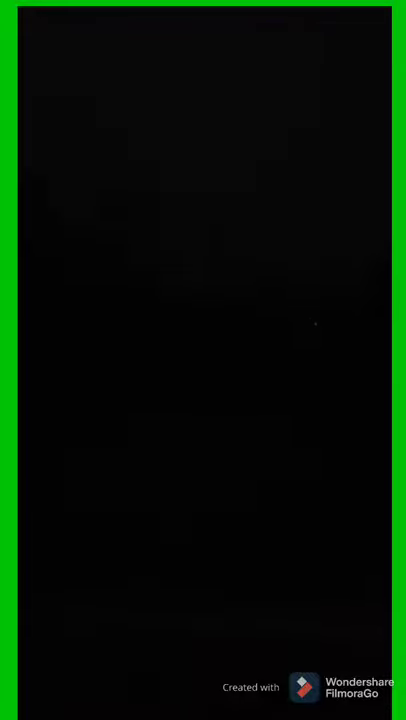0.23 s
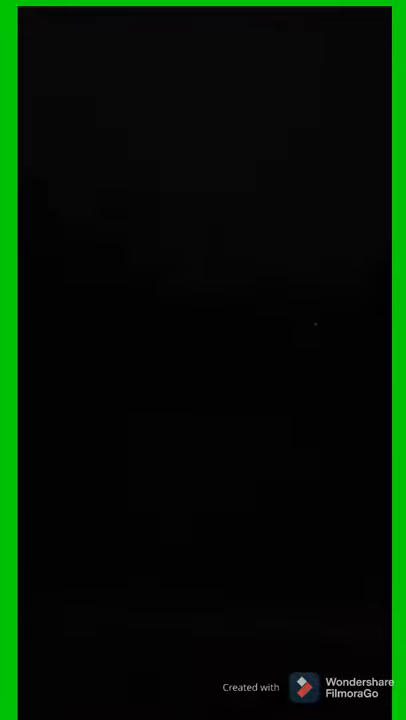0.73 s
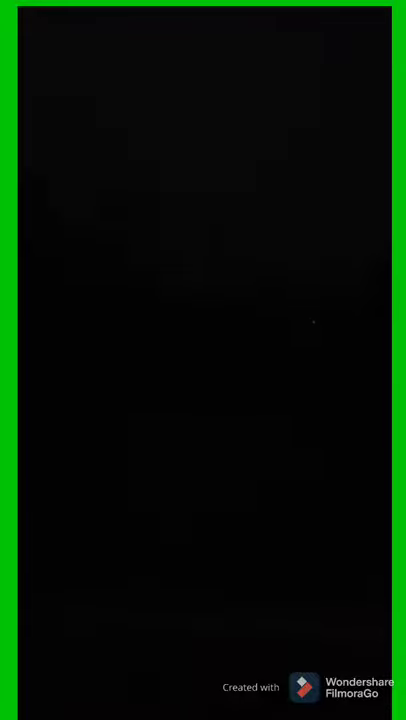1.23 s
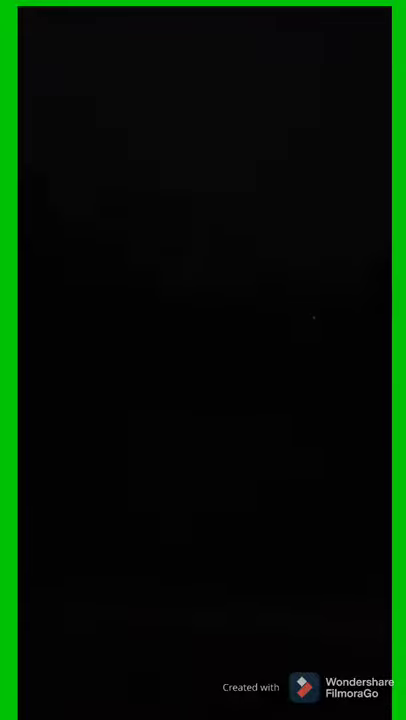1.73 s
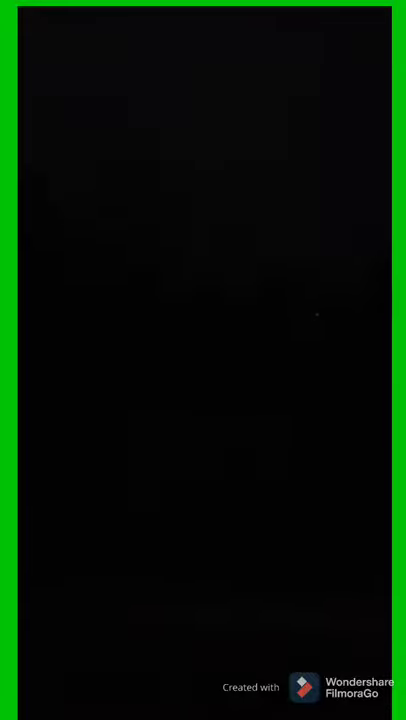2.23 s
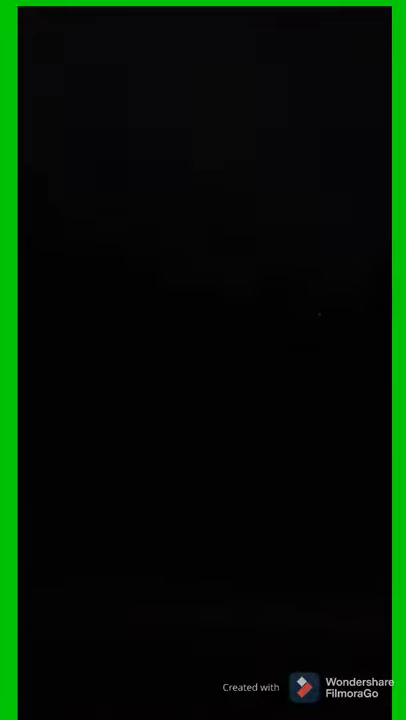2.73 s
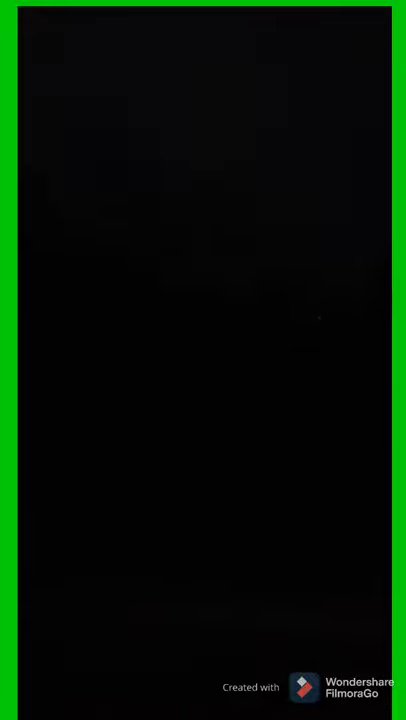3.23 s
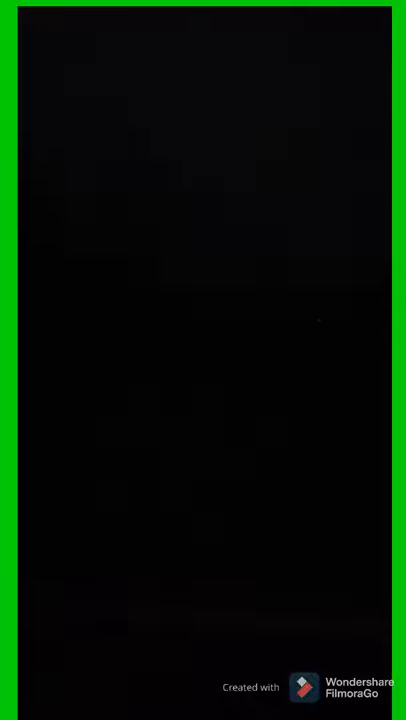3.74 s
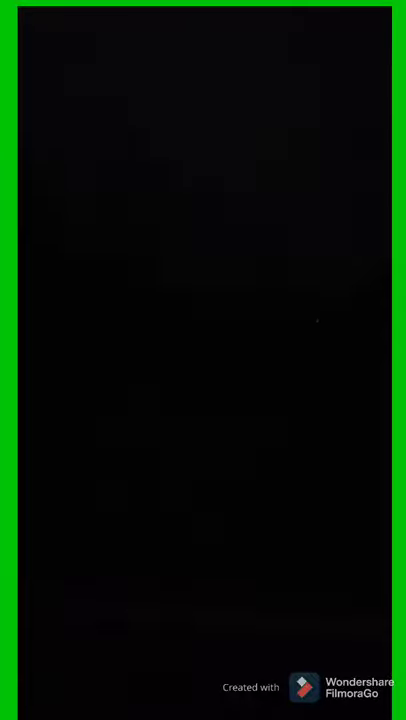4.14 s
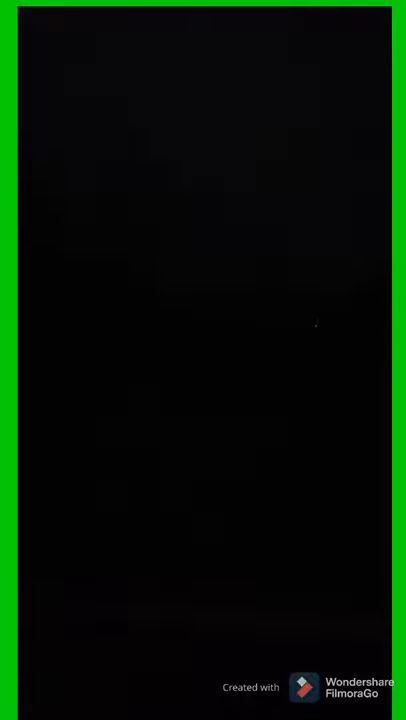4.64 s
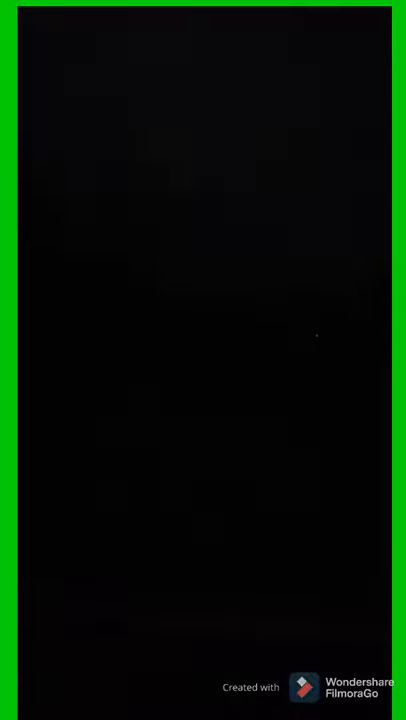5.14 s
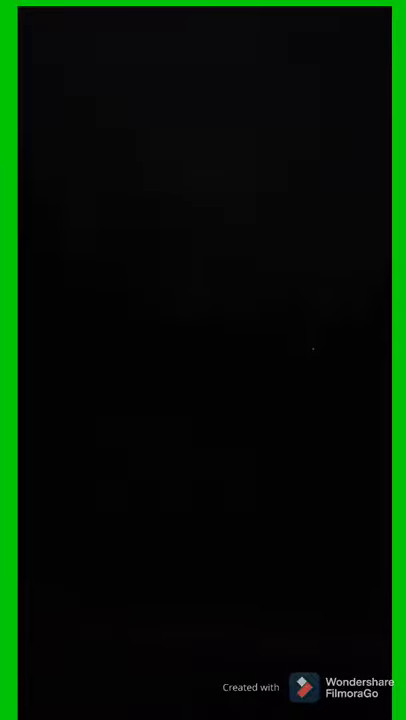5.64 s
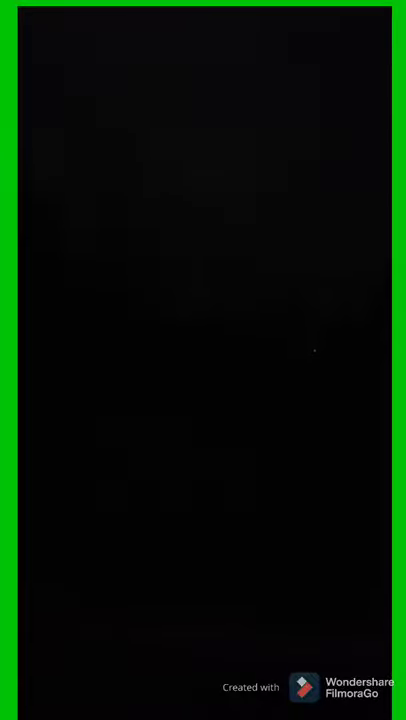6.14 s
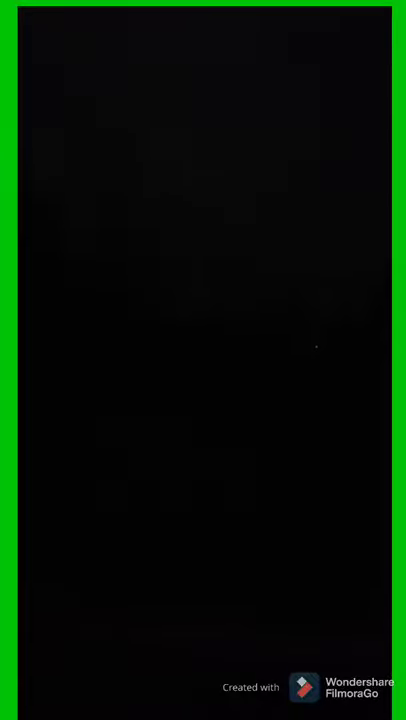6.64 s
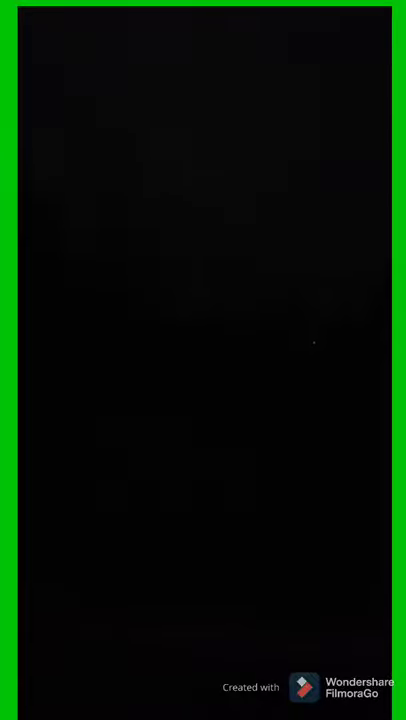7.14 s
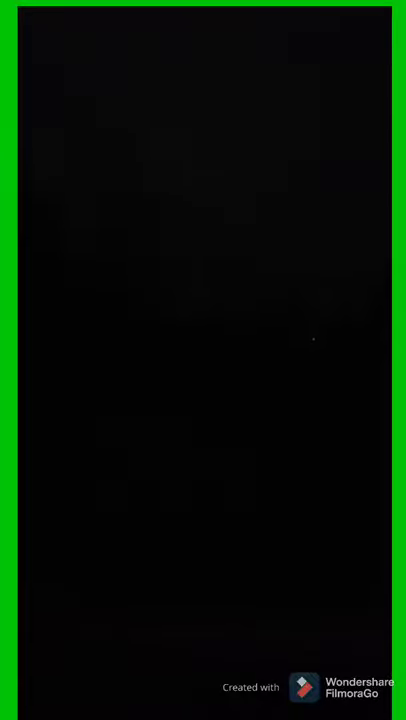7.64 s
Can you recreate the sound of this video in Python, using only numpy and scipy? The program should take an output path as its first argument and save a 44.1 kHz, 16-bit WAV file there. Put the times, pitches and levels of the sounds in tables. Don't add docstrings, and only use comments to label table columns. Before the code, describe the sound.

Coyotes call over open ground in the dark: short moans and whines first, a cluster of yips, a rapid burst of hoarse closer barks, then one long sustained howl with gruff barks beneath it. It cracks high, falls and fades through low wavering moans. Diffuse echoes trail each cry. A low electrical hum and far traffic rumble stay constant, with thin insect hiss to the left and a few soft wind thumps on the phone's right microphone.

```python
import sys
import numpy as np
from scipy import signal
from scipy.fft import rfft, irfft, next_fast_len
from scipy.io import wavfile
from scipy.ndimage import uniform_filter1d

SR = 44100
rng = np.random.default_rng(int(sys.argv[2]) if len(sys.argv) > 2 else 0)


def how_loud(loudness_db):
    steps = np.asarray(loudness_db, float) / 20
    return 10 ** steps


def store_wav(level_fs):
    pcm = np.round(np.clip(np.atleast_2d(level_fs), -1, 1) * 32767)
    wavfile.write(sys.argv[1], SR, pcm.T.astype(np.int16))


N = 347803

# (time [s], pitch [Hz], effort [dB], mouth opening on upper partials [dB])
OPENING_HOWL = [(0, 636, -33.5, -14), (.1, 616, -42, -12), (.15, 608.7, -44, -10), (.25, 615.4, -46.5, -4),
                (.289, 629.5, -34.5, -4.5), (.315, 752, -48, -11), (.335, 709, -40, -4),
                (.36, 617.3, -35.5, -9), (.429, 570, -70, 2)]
LOW_MOAN = [(.37, 512, -58, -19), (.392, 505, -56, 11.5), (.47, 481, -53.5, 6), (.545, 504.6, -63, 3),
            (.6, 537, -48, -5)]
RISING_MOAN = [(.74, 492, -48, -11), (.772, 495.5, -48.5, 1), (.81, 499, -58, -2), (.85, 514, -47, -2),
               (.88, 536, -50.5, -8), (.908, 549, -51, -4), (.922, 581, -42, -3), (.945, 616.6, -39, 0),
               (.99, 607.4, -46.5, 2), (1.03, 620, -53.5, 7), (1.055, 605, -67, 1)]
WAVERING_MOAN = [(1.07, 525, -55.5, -1), (1.12, 548, -55.5, 4), (1.18, 524.6, -60, 3.5),
                 (1.24, 483.6, -58, 2.5), (1.3, 523, -54.5, 6), (1.36, 494, -56, 6.5),
                 (1.394, 501, -52.5, 7), (1.442, 546, -50, -8), (1.494, 543, -41.5, -11.5),
                 (1.539, 544, -42, -16)]
SQUEAK = [(2.89, 1035, -46.5, -14), (2.93, 1166, -40.5, -11.5), (2.972, 1200, -25, -23),
          (2.985, 1209, -33, -24.5), (3.0, 1404, -44, -26)]
LAST_MOAN = [(6.92, 474.6, -54, -2), (7.0, 466.5, -53, -7), (7.05, 453.4, -44, -10.5), (7.11, 500, -53, 3),
             (7.14, 498, -65, -10), (7.17, 496.7, -48.5, 1), (7.205, 488, -50, -8), (7.24, 480, -46, 4.5),
             (7.28, 448, -52, -24), (7.35, 417, -49, -18), (7.43, 407, -52, -19)]
# (time [s], pitch [Hz], effort [dB], mouth opening [dB], lips on third partial [dB])
HOWL_SWELL = [(2.965, 666, -53.5, -8.5, -10.5), (2.99, 714, -39.5, -13, -9), (3.02, 745, -37, -18.5, -13),
              (3.05, 743.5, -38, -16.5, -20), (3.07, 738, -37, -15, -3), (3.098, 725.5, -36.5, -9, -0.5),
              (3.19, 710, -42.5, -16.5, 9), (3.256, 699.6, -39.5, -2.5, -1), (3.36, 682.5, -36.5, -3, -16),
              (3.5, 699, -34, -10, -7), (3.6, 698, -34.5, -15, -2.5), (3.665, 698.8, -33, -27, -6.5),
              (3.72, 699, -34, -9.5, -5.5), (3.79, 703.5, -37, -6, -10), (3.87, 727, -32.5, -28.5, -27),
              (3.925, 741, -34, -13.5, -32), (3.985, 755, -45, -18, -28)]
HOWL_HOLD = [(3.96, 748.6, -45.5, -16, -29.5), (4.04, 742, -33.5, -21, -24.5), (4.11, 726, -34, -9, -22),
             (4.2, 710, -33.5, -13.5, -19), (4.225, 700, -39.5, -20.5, -22), (4.28, 687.7, -31.5, -20, -18),
             (4.34, 680.4, -35.5, -8.5, -7.5), (4.41, 692.5, -32, -20, -7.5),
             (4.46, 710.5, -36, -17.5, -22), (4.52, 719.5, -33, -21.5, -26),
             (4.59, 719.4, -32.5, -34, -17.5), (4.65, 713, -38.5, -10.5, -14.5),
             (4.75, 705.3, -35.5, -18.5, -17), (4.79, 700.5, -37, -18, -8), (4.84, 758, -38, -18, -22)]
BREAK_AND_FALL = [(4.815, 807.6, -54, -2.5, -9), (4.855, 903.4, -39.5, -0.5, -4),
                  (4.915, 888.7, -44, -2, -2), (4.957, 786, -48.5, -2, -3.5), (5.05, 766, -45.5, -11, -3),
                  (5.118, 748.4, -34.5, -16, -26), (5.17, 729.6, -42, -20, -6), (5.21, 713, -37, -18, -13),
                  (5.25, 690.7, -33.5, -15, -16), (5.285, 660.7, -45, 1, 0),
                  (5.32, 652.7, -35.5, -6.5, -20), (5.37, 610.3, -45, 0, -12), (5.4, 594, -36, -21, -16),
                  (5.44, 579.5, -48, -20, -12), (5.485, 549, -40, -26, -11), (5.53, 527, -54, -6, -8)]
LOW_HOLD = [(5.515, 538.6, -59, -4, -8), (5.62, 498.5, -53, -3, -6), (5.72, 492.7, -47, -5, -16),
            (5.775, 496.4, -53, -20, -16), (5.82, 493.8, -46.5, -1.5, -14), (5.95, 500, -49.5, -1, -14),
            (6.07, 470, -49, -2.5, -14), (6.11, 462, -46, -16, -16), (6.19, 477.7, -48.5, -7.5, -12),
            (6.215, 478, -57, -13, -10), (6.25, 475, -57, 3.5, 0), (6.33, 452, -48, -9, -2),
            (6.45, 444.4, -43, -6, -6), (6.56, 452, -44.5, -9.5, -4), (6.62, 456, -55, -24, -10),
            (6.7, 495, -51, -12, -12)]
# (howl, third partial [dB], throb rate [1/s], throb depth [dB], moment of least fundamental [s])
LEAD_VOICE = [
    (LOW_MOAN, -23, 8.2, 2.4, 0.481),
    (RISING_MOAN, -30, 12.5, 0.8, 0.84),
    (WAVERING_MOAN, -20, 9.7, 1.3, 1.3),
    (SQUEAK, -26, 7.8, .4, 3.2),
    (OPENING_HOWL, -35, 5.7, 0.44, 0.19),
    (HOWL_SWELL, -10.5, 2.7, 0.48, 4.3),
    (HOWL_HOLD, -12.5, 14, 0.34, 2.2),
    (BREAK_AND_FALL, -11, 20, 0.83, 5.33),
    (LOW_HOLD, -22, 7.9, 0.66, 5.7),
    (LAST_MOAN, -22, 15.3, 1.9, 6.6),
]
# (frequency [Hz], level [dB])
HEAD = [(430, -8.5), (620, -1.5), (720, 0), (1000, -2), (1400, -10), (1850, -21), (2100, -12),
        (2320, -21.5)]
# (time [s], pitch [Hz], effort [dB], mouth opening [dB])
BRIGHT_YELP = [(3.172, 580, -58.5, 14), (3.19, 613, -58, 16), (3.215, 653, -56.5, 20),
               (3.24, 607, -57.5, 13), (3.262, 570, -59.5, 13)]
LATE_BREAK = [(6.66, 493, -55.5, 2), (6.715, 501, -64, 1.5), (6.735, 612, -65, 4.1), (6.77, 681, -62, 7.5),
              (6.795, 682, -58.5, 5.2), (6.825, 620, -56, 4.2), (6.84, 590, -70, 3)]
FALLING_CRY = [(.635, 702, -59.5, 6.8), (.655, 659, -51.5, 6.7), (.668, 612, -54, 5), (.676, 539, -57, 4.3),
               (.7, 521, -52, 3.9), (.72, 490, -59, 3)]
SINKING_CRY = [(6.8, 556, -63, 3), (6.825, 538, -53.5, 3.4), (6.845, 523, -64, 2.6), (6.865, 502, -56, 3),
               (6.89, 448, -59, 2)]
# (start [s], length [s], top pitch [Hz], effort [dB], mouth opening
# [dB])
YIPS = [
    (1.243, 0.13, 682, -55, -19),
    (1.563, 0.081, 712, -50.5, 2.5),
    (1.724, 0.099, 720, -53.5, 5.5),
    (1.922, 0.075, 711, -55.5, 7),
    (1.634, .06, 642, -60, 3),
    (1.989, 0.089, 644, -63.5, 2),
]
# (start [s], length [s], top pitch [Hz], effort [dB], mouth opening [dB])
WHINES = [(.593, 0.066, 709.3, -51.5, 2), (.66, 0.24, 710.6, -66, 5.5), (0.995, 0.054, 499.6, -58, 1.5),
          (1.075, 0.09, 610, -56.5, -3), (1.02, .07, 720, -65.5, 3.5), (1.56, 0.12, 590.5, -48.5, -11.5),
          (1.75, 0.17, 726, -62, 6), (1.8, 0.075, 580, -50, -8), (1.99, 0.088, 556, -54, -8.5),
          (7.105, 0.054, 617, -61, 7), (7.32, 0.073, 605, -70, 1.5), (7.13, 0.047, 725, -68.5, 7),
          (1.085, .09, 815, -73, 15.5), (1.25, .1, 996, -81, 16), (4.84, .14, 711, -50, -24.5),
          (4.91, 0.064, 591, -50.5, -25), (5.48, 0.097, 715, -53.5, -25), (.3, 0.061, 345.5, -45, -30),
          (1.55, 0.041, 358.6, -41.5, -31), (4.04, 0.085, 340, -46, -32), (4.29, 0.044, 389, -48.5, -29),
          (4.385, 0.047, 396, -40, -28), (5.25, 0.054, 355, -49.5, -28)]
# (time [s], effort [dB], pitch [Hz], brightness [dB per octave])
FIRST_BARK = [(2.27, -68, 481, 0), (2.302, -51, 481, 0.5), (2.318, -42.5, 501, -1), (2.33, -37.5, 570, 0.5),
              (2.36, -34.5, 584, 5), (2.385, -32.5, 621, 7), (2.4, -33, 700, 0.5),
              (2.429, -41.5, 673, -0.5), (2.48, -57, 660, -4)]
SECOND_BARK = [(2.51, -52, 489, -10.5), (2.548, -32, 590, -4), (2.581, -32.5, 595, 5.5),
               (2.602, -28, 590, 9), (2.618, -33, 781, 7.5), (2.64, -36, 749.5, 5), (2.665, -39, 670, 1),
               (2.69, -35, 641, -2), (2.73, -47.5, 640, 6)]
THIRD_BARK = [(2.73, -49.5, 517, -3.5), (2.76, -35.5, 545, -2), (2.775, -38.5, 660, 3.5),
              (2.795, -37.5, 700, 4), (2.815, -39, 716, 3.5), (2.825, -39.5, 598, -1.5),
              (2.85, -43.5, 590, -3.5), (2.89, -56, 571, -2.5)]
LOW_BARK = [(2.645, -54, 404, 9), (2.685, -44, 428.7, 8.3), (2.705, -47, 426.2, 5.3),
            (2.725, -37, 448.4, 6.1), (2.76, -42.5, 439, 4), (2.801, -37.5, 480.5, 5),
            (2.85, -52, 475, 5.1)]
# (start [s],
# length [s], effort [dB], top pitch [Hz], brightness [dB per octave])
MID_BARKS = [(4.065, 0.056, -50, 479, 1.5), (4.105, 0.09, -39, 488, 2.5), (4.15, 0.098, -37.5, 615.4, 0.5),
             (4.215, .08, -51, 559, -1.5), (4.28, 0.1, -43.5, 471.5, 2.5), (4.31, 0.062, -39.5, 556, -3),
             (4.345, .095, -33, 620.6, -1.5), (4.4, .07, -43.5, 490, 0.5), (4.45, 0.081, -55, 485.5, 0),
             (5.15, 0.16, -53.5, 598, -2), (5.32, 0.153, -56.5, 601, 10.5), (7.6, 0.24, -71, 586, 19),
             (7.64, 0.19, -73, 476, 30), (2.88, 0.11, -54.5, 744, 15.5), (2.97, .1, -51.5, 723, 15.5),
             (3.28, .2, -54.5, 560, 3.5), (3.45, .15, -58, 530, 5), (3.571, .16, -57, 558, 3.5)]
# (frequency [Hz], width [Hz], level [dB])
THROAT = [(346, 39, -15.5), (590, 101, 10.5), (700, 70, 4.5), (843, 60, 7.5), (987, 78, 8),
          (1204, 150, 1.5), (1448, 100, -7.5), (1691, 73, -6), (2120, 222, -20), (2630, 300, -39)]
# (frequency [Hz], time [s])
ECHO_T60 = [(300, 1.5), (700, 1.22), (1500, 1.17), (3000, 0.77)]
# (delay [s], spread [s], level [dB])
TREELINE = [
    (.16, .06, 2),
    (.47, .1, 6),
]
# (middle [s], peak [dB], pitch [Hz], length [s])
PUFFS = [
    (1.556, -18, 75, 0.023),
    (4.072, -25.5, 62, 0.024),
    (4.166, -23, 68, 0.02),
    (4.249, -27.5, 58, 0.046),
    (4.403, -32, 55, 0.034),
    (6.641, -33, 60, 0.051),
]
# (frequency [Hz], level [dB per Hz])
INSECTS = [(6080, -39), (6220, -5.5), (6500, -4.5), (7050, -0.5), (7350, -1), (7700, -7.5), (7900, -8),
           (8020, -39)]
# (time [s], level [dB])
INSECT_LEVEL = [(0.0, -67.5), (0.42, -68.5), (0.46, -64.5), (0.77, -69.5), (6.48, -70), (7.56, -70.5),
                (7.89, -69.5)]
# (multiple of twice the line rate, level [dB], waver [dB])
HUM = [(1, -36.5, 0.44), (2, -56.5, -1), (3, -60.5, 2.5), (4, -53.5, 1.5), (5, -60.5, 3), (6, -70.5, 1.5)]
# (frequency [Hz], level [dB per Hz])
NIGHT = [(20, -16.5), (40, -17.5), (62, 1.5), (95, -3.5), (170, -8), (350, -14), (520, -16.5), (800, -19),
         (1300, -37), (2000, -54), (3000, -60.5), (6000, -70)]
# (frequency [Hz], likeness [0 to 1])
NIGHT_SAME = [(30, 0.37), (60, 0.6), (160, 0.61), (270, 0.93), (450, 1), (740, 0.91), (1220, 0.93),
              (2500, 0.24)]
# (time [s], level [dB])
NIGHT_LEVEL = [(0, 1), (2.2, -.5), (3.5, 0.3), (5, 1), (6.5, -0.5), (7.3, 0.5), (7.89, -1.5)]
# (frequency [Hz], level [dB per Hz])
HISS = [(300, -3), (1500, 3.5), (4000, -1), (5800, -3), (8500, -10), (10500, -6), (12500, 0.5), (15700, -1)]


def evened(x):
    return x / np.sqrt(np.mean(x ** 2) + 1e-20)


def read(points, hz):
    f, value = np.transpose(points)
    return np.interp(np.log(hz + 1), np.log(f + 1), value)


def add(mix, s, sound):
    part = mix[round(s * SR):][:len(sound)]
    part += sound[:len(part)]


def drift(count, width_s):
    size = max(int(width_s * SR), 1)
    return evened(uniform_filter1d(uniform_filter1d(rng.standard_normal(count), size), size))


def bandpass(x, low_hz, high_hz):
    return signal.lfilter(*signal.butter(2, [low_hz, high_hz], "band", fs=SR), x)


def howl(rows, jitter=.004, flutter_db=1.5, breath_db=-24, hoarse=.3, fade_s=0.017):
    s, *columns = np.transpose(rows)
    t = np.arange(s[0], s[-1], 1 / SR)
    hz, *levels_db = (np.interp(t, s, c) for c in columns)
    slide = abs(np.gradient(np.log(hz))) * SR
    glide = np.clip(uniform_filter1d(slide, 900) / 6, 0, 1)
    wander = 1 + (jitter + .012 * glide) * drift(len(t), .004)
    phase = 2 * np.pi * np.cumsum(hz * wander) / SR
    partials = 0
    for k, db in enumerate(levels_db):
        flutter = flutter_db * (k + .5) ** 1.45 * drift(len(t), 0.014)
        partials = partials + how_loud(db + flutter) * np.sin((k + 1) * phase)
    haze = 1 + how_loud(breath_db) * drift(len(t), .0008) + hoarse * glide * drift(len(t), .003)
    halves = 1 + hoarse * glide * np.cos(phase / 2)
    already_on = fade_s / 2 * (t[0] == 0)
    edges = np.clip(np.minimum(t - t[0] + already_on, t[-1] - t) / fade_s, 0, 1)
    return s[0], np.sqrt(2) * partials * haze * halves * edges


def sung(rows, third_db, rate=5.0, throb_db=0.0, dip_s=0.0):
    s, *columns = np.transpose(rows)
    t = np.append(np.arange(s[0], s[-1], .005), s[-1])
    hz, effort_db, open_db, *lips_db = (np.interp(t, s, c) for c in columns)
    wave = .5 + .5 * np.cos(2 * np.pi * rate * (t - dip_s))
    depth, sharp = 3, 2.8
    odd_db = throb_db * (1 - depth * wave ** sharp)
    even_db = 1.5 * throb_db * (1 - depth * (1 - wave) ** sharp)
    lip_db = lips_db[0] if lips_db else 0.56 * open_db
    first = effort_db + read(HEAD, hz) + odd_db
    second = effort_db + read(HEAD, 2 * hz) + open_db + even_db
    third = effort_db + read(HEAD, 3 * hz) + lip_db + third_db + odd_db
    return np.transpose([t, hz, first, second, third])


def arch(start, length, skew, sharp):
    u = np.linspace(0, 1, 24)
    return start + length * u, abs(np.sin(np.pi * u ** skew)) ** sharp


def short_call(row, bend, skew, sharp, ends_db, third_db, opens_db):
    start, length, top_hz, effort_db, open_db = row
    t, a = arch(start, length, skew, sharp)
    mouth_db = open_db + opens_db * ((t - start) / length - .5)
    rows = np.transpose([t, top_hz * (1 - bend * (1 - a)), effort_db + ends_db * (1 - a), mouth_db])
    return sung(rows, third_db)


def yip(row):
    return short_call(row, bend=.21, skew=.6, sharp=1.2, ends_db=-1, third_db=-21.5, opens_db=4)


def whine(row):
    return short_call(row, bend=0.05, skew=.8, sharp=0.5, ends_db=-2, third_db=-26, opens_db=-5.0)


def bark(rows, jitter=.05, halves=.7):
    s, *columns = np.transpose(rows)
    t = np.arange(s[0], s[-1], 1 / SR)
    effort_db, hz, bright_db, rough = (np.interp(t, s, c) for c in columns)
    rough = np.clip(rough, 0, 1)
    turns = np.cumsum(hz * (1 + jitter * drift(len(t), .003))) / SR
    uneven = halves * np.clip(hz / 330 - 1, 0, 1)
    pulses = sum(np.cos(2 * np.pi * k * turns) for k in range(1, 5))
    folds = pulses * (1 + uneven * np.cos(np.pi * turns))
    puffs = (0.4 + np.exp(-(turns % 1) / .3)) * rng.standard_normal(len(t))
    drive = (1 - rough) * evened(folds) + .7 * rough * evened(puffs)
    throat = 0
    for k, (f, width, db) in enumerate(THROAT):
        ring = resonate(resonate(drive, f, 1.6 * width), f, 1.6 * width)
        throat = throat + (-1) ** k * how_loud(db + bright_db * np.log2(f / 900)) * ring
    steady = throat / np.sqrt(abs(uniform_filter1d(throat ** 2, 1500)) + 1e-12)
    effort = how_loud(effort_db + 2.0 * drift(len(t), 0.004))
    return s[0], effort * steady * signal.windows.tukey(len(t), .15)


def resonate(x, hz, width):
    return signal.lfilter(*signal.iirpeak(hz, hz / width, SR), x)


def pushed(rows):
    return np.column_stack([rows, np.interp(np.transpose(rows)[3], [-3, 7], [.1, .42])])


def barked(start, length, effort_db, top_hz, bright_db):
    t, a = arch(start, length, skew=.7, sharp=1)
    ends = 1 - a
    return np.transpose([t, effort_db - 12 * ends, top_hz * (1 - .14 * ends),
                         bright_db - 5 * ends, .18 + .04 * a])


def pack():
    far, lead, near, mid = np.zeros((4, N))
    cries = [sung(BRIGHT_YELP, third_db=-3.5), sung(LATE_BREAK, third_db=-25),
             sung(FALLING_CRY, third_db=-30), sung(SINKING_CRY, third_db=-26)]
    for rows in cries + [yip(row) for row in YIPS] + [whine(row) for row in WHINES]:
        add(far, *howl(rows, jitter=.004, flutter_db=1.3, breath_db=-22, hoarse=.2, fade_s=.004))
    for voice in LEAD_VOICE:
        add(lead, *howl(sung(*voice), jitter=.0018, flutter_db=.9, breath_db=-32, hoarse=.2))
    for rows in FIRST_BARK, SECOND_BARK, THIRD_BARK, LOW_BARK:
        add(near, *bark(pushed(rows), jitter=.032, halves=.85))
    for row in MID_BARKS:
        add(mid, *bark(barked(*row), jitter=.03, halves=.9))
    direct = how_loud(2.0) * (far + lead) + how_loud(-0.23) * (near + mid)
    aimed = lead + 3.2 * bandpass(lead, 1500, 1900)
    thrown = how_loud(0.5) * far + how_loud(-4.5) * aimed + how_loud(-1.5) * near + how_loud(-5.0) * mid
    ports = np.array([direct, np.roll(direct, 3)]) + echoes(thrown)
    return ports + np.array([[.25], [-.25]]) * bandpass(ports, 900, 1700)


def echoes(x):
    taps = np.zeros((2, 2 * SR))
    at = np.arange(300, 2 * SR - 40, 40) + rng.integers(0, 40, (2, (2 * SR - 301) // 40))
    np.put_along_axis(taps, at, rng.choice([-1., 1.], at.shape), 1)
    taps[1] = .85 * taps[1] + .5 * taps[0]
    hz, t, z = signal.stft(taps, SR, nperseg=256)
    humps_db = sum(db * np.exp(-((t - delay) / spread) ** 2) for delay, spread, db in TREELINE)
    ground = 4.5 * np.exp(-t / .015)
    decay = how_loud(humps_db - 60 * t / read(ECHO_T60, hz)[:, None])
    tail = signal.istft(z * (decay + ground), SR, nperseg=256)[1]
    lows = signal.lfilter(*signal.butter(2, 2000, fs=SR), tail)
    tail = tail / np.linalg.norm(lows[0]) * np.sqrt(2000 / (SR / 2))
    shimmer = 1 + .36 * drift(N, .01)
    return signal.fftconvolve(x[None] * shimmer, tail, axes=1)[:, :N]


def wind():
    out = np.zeros(N)
    for s, db, hz, length in PUFFS:
        t = np.arange(0, 1.67 * length, 1 / SR)
        middle = t[-1] / 2
        push = np.cos(2 * np.pi * hz * (t - middle)) * np.hanning(len(t)) ** 2.5
        add(out, s - middle, how_loud(db) * push)
    return out * how_loud(np.array([[-24], [0]]))


def insects():
    s, db = np.transpose(INSECT_LEVEL)
    level = how_loud(np.interp(np.arange(N) / SR, s, db) + 3.5 + 0.5 * drift(N, 0.036))
    chorus = noise(INSECTS, [(100, 0.0032), (9000, 0.004)], patchy_db=1.0)
    return level * chorus * how_loud(np.array([[0], [-30]]))


def hum():
    hum_hz, right_lead = 120.03, .33
    t = np.arange(N) / SR
    phase = 2 * np.pi * hum_hz * t + np.array([[0], [right_lead]])
    eased_db = np.interp(t, [4, 7.5], [0, -1.5])
    out = 0
    for k, db, waver_db in HUM:
        level = how_loud(db + (k - 1) * eased_db + waver_db * drift(N, 0.16))
        out = out + np.sqrt(2) * level * np.sin(round(k) * phase + 6 * rng.random())
    return out


def night():
    level_db = -47.5 + np.interp(np.arange(N) / SR, *np.transpose(NIGHT_LEVEL))
    return how_loud(level_db) * noise(NIGHT, NIGHT_SAME, patchy_db=1.0)


def noise(shape, same, patchy_db):
    frames, hz = N // 512 + 5, np.fft.rfftfreq(2048, 1 / SR)
    a, b, c, d, patches = rng.standard_normal((frames, 1025, 5)).T
    patches = evened(uniform_filter1d(uniform_filter1d(patches, 14, 0), 8, 1))
    like = np.clip(read(same, hz), -1, 1)[:, None]
    left = a + 1j * b
    z = np.array([left, like * left + np.sqrt(1 - like ** 2) * (c + 1j * d)])
    below = np.where(hz < shape[0][0], 2, 1)
    z *= how_loud((read(shape, hz) * below)[:, None] + patchy_db * patches)
    return evened(signal.istft(z, nperseg=2048, noverlap=1536)[1][:, :N])


def microphone_hiss():
    hiss = noise(HISS, [(100, 0.011), (9000, 0.0033)], patchy_db=.5)
    return how_loud(-67.5) * hiss * how_loud(np.array([[.5], [-.5]]))


def scene():
    return pack() + wind() + insects() + hum() + night()


def band_limit(x):
    return signal.sosfilt(signal.butter(12, 16420, fs=SR, output="sos"), x)


def record(dry):
    ports = (dry + microphone_hiss()) * np.minimum(.5 + np.arange(N) / 300, 1)
    size = next_fast_len(N + 4096)
    passed = np.fft.rfftfreq(size, 1 / SR) < 15740
    limited = irfft(rfft(ports, size) * passed, size)[:, :N]
    return band_limit(limited)


dry = scene()
out = record(dry)
store_wav(out)
```